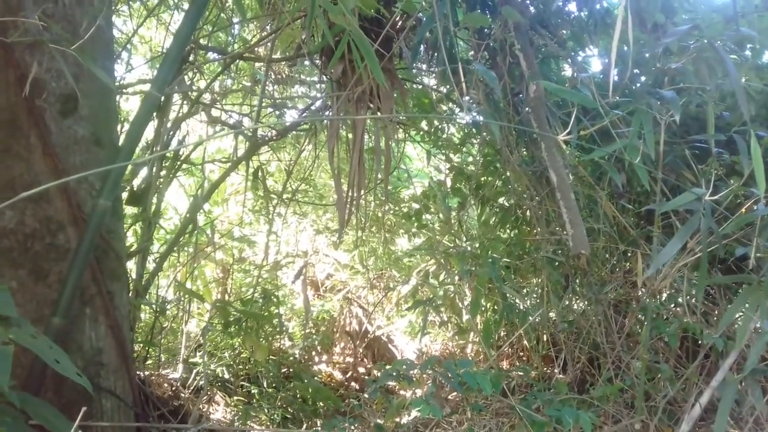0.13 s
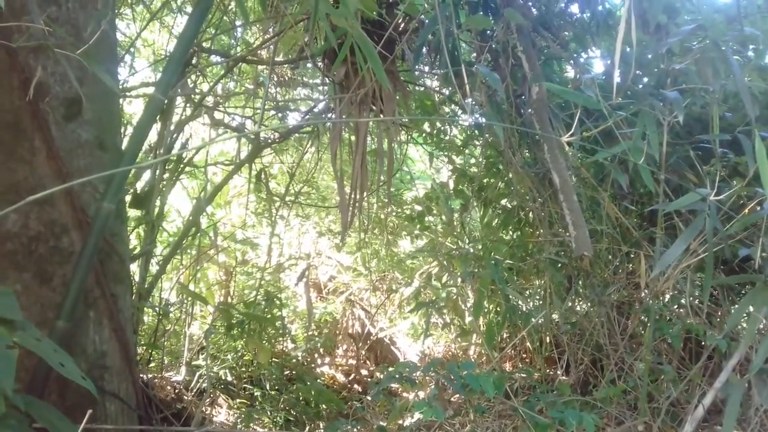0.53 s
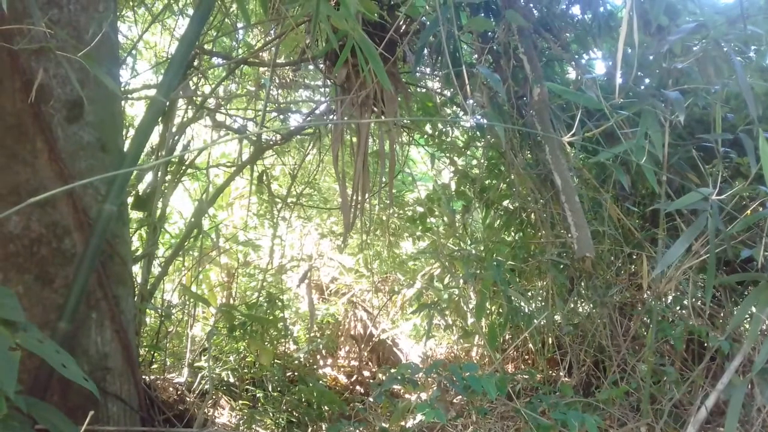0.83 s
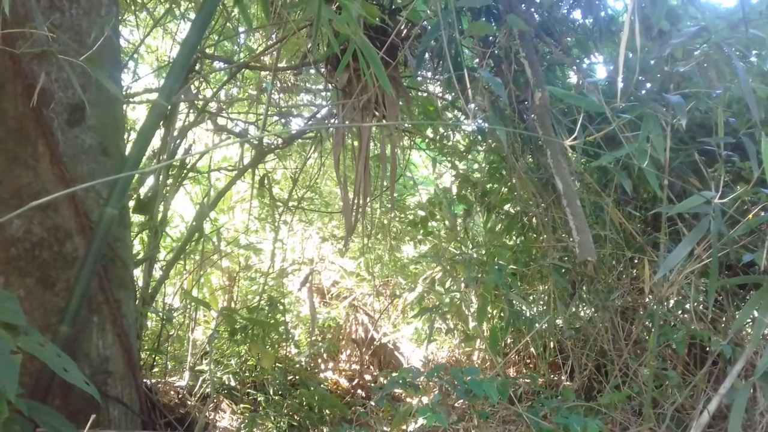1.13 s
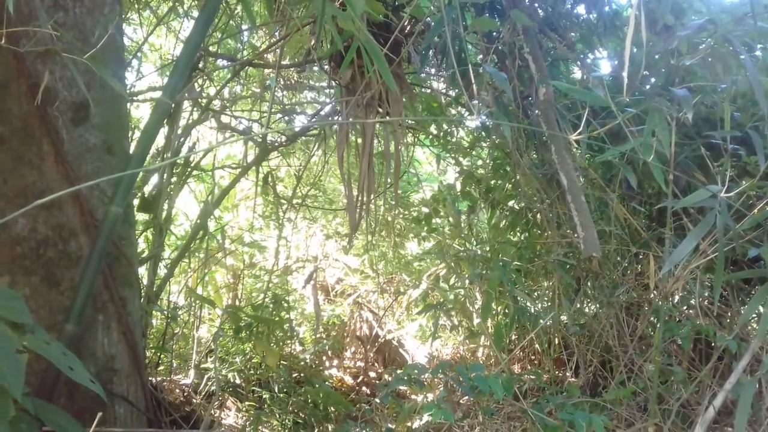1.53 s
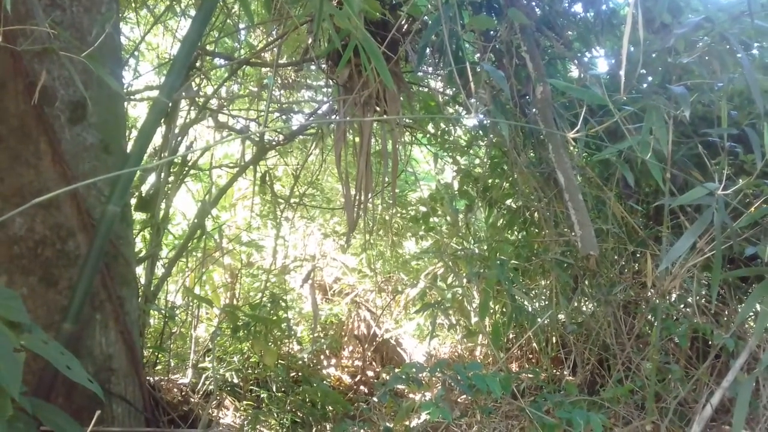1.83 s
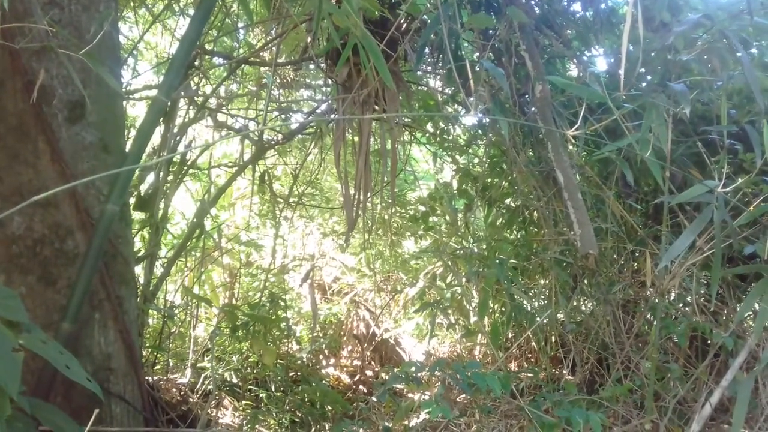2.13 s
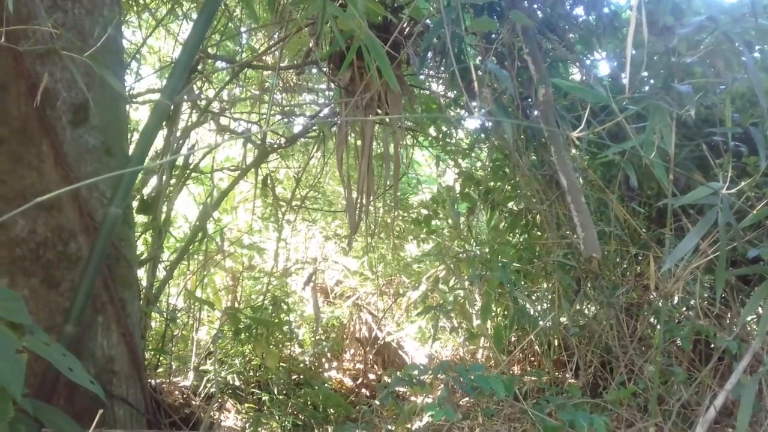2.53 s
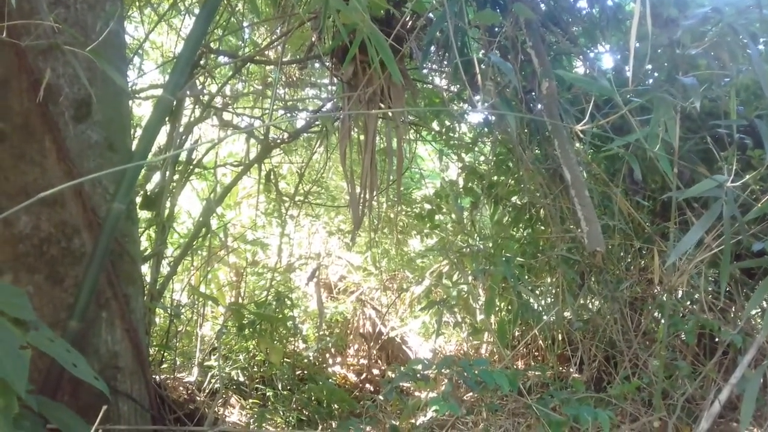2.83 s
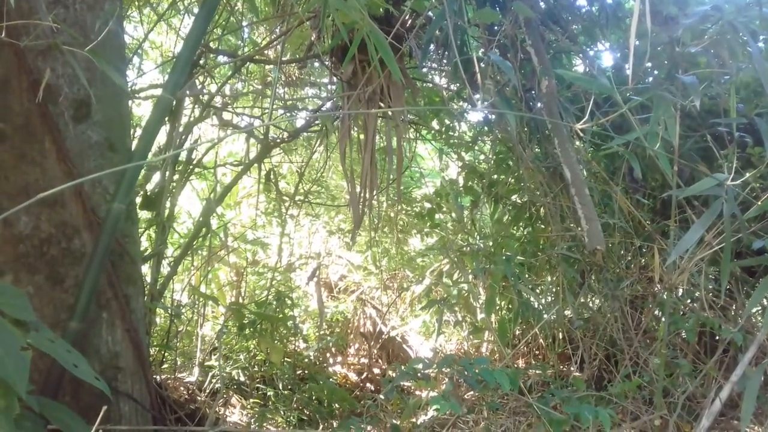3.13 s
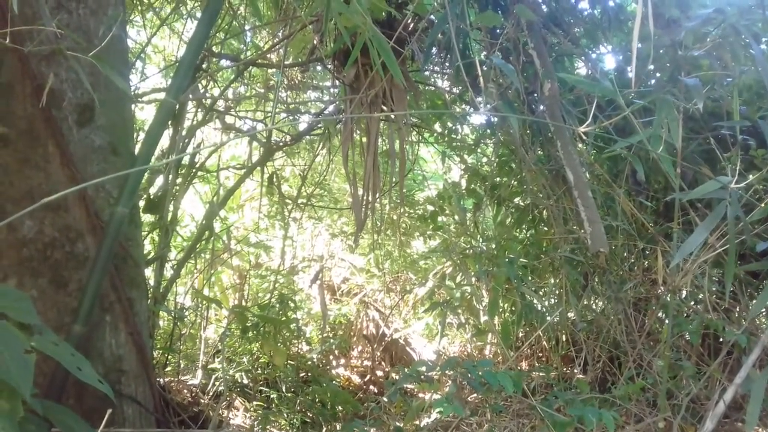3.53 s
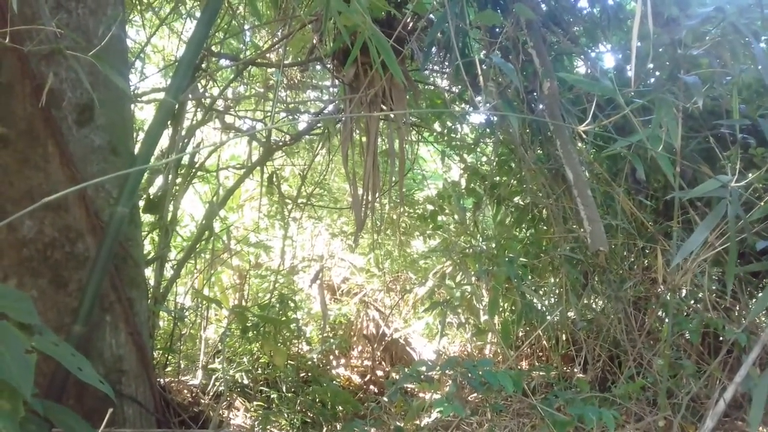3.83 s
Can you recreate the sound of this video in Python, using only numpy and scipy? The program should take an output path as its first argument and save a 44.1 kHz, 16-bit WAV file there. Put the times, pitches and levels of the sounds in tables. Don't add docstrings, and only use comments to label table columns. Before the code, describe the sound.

Harsh, short rasping squawks begin at once, answered by duller nasal honks; a tiny falling songbird whistle comes midway, then a dense burst of calls. Trunks and leaves scatter the sound over quiet hiss and hum.

```python
import sys
import numpy as np
from scipy import signal
from scipy.fft import rfft, irfft
from scipy.io import wavfile
from scipy.ndimage import uniform_filter1d

SR = 44100
rng = np.random.default_rng(int(sys.argv[2]) if len(sys.argv) > 2 else 0)


def master(y):
    cut = np.clip(np.atleast_2d(y).T, -1, 1)
    pcm = np.round(cut * 32767)
    wavfile.write(sys.argv[1], SR, pcm.astype(np.int16))


def invert_db(x):
    u = np.asarray(x, float) / 20
    return 10 ** u


N = 176400
PAD = 4096


def band(x, hz, width_hz):
    return signal.lfilter(*signal.iirpeak(hz, hz / width_hz, fs=SR), x)


def butter(x, order, hz, kind="low"):
    return signal.sosfilt(signal.butter(order, hz, kind, fs=SR, output="sos"), x)


def unit(x):
    return x / np.sqrt(np.mean(x ** 2) + 1e-18)


def walk(rate):
    hold = int(SR / rate)
    steps = np.repeat(rng.standard_normal(N // hold + 1), hold)
    smooth = uniform_filter1d(uniform_filter1d(steps, hold), hold)
    return unit(smooth[:N])


def add(track, start, sound):
    at = PAD + int(start * SR)
    track[at:at + len(sound)] += sound


# f/Hz, level/dB
HUM_LINES = [(125.5, -71.5), (252, -78)]


def hum():
    turn = np.cumsum(1 + .008 * walk(0.6) + 0.0095 * walk(60.1)) / SR
    return sum(invert_db(db + 0.5) * np.sin(2 * np.pi * hz * turn) for hz, db in HUM_LINES)


# f/Hz, level/dB per Hz
HUSH_COLOUR = [(20, -24), (200, -13.5), (420, -6.5), (700, 0.5), (2000, -6.5), (2500, -13), (9000, -17.5),
               (15600, -14.5)]


def hush():
    level_db, sway_db, flicker_db = -56.5, .6, 1.3
    hz = np.fft.rfftfreq(N, 1 / SR) + 1
    table = np.array(HUSH_COLOUR)
    colour = invert_db(np.interp(np.log(hz), np.log(table[:, 0]), table[:, 1]))
    spectrum = rfft(rng.standard_normal(N)) * colour
    sway = sway_db * walk(1.71)
    octave = np.log2(hz / 20)
    total = np.zeros(N)
    for k in range(11):
        share = np.clip(1 - abs(octave - k), 0, 1)
        total += irfft(spectrum * share, N) * invert_db(sway + flicker_db * walk(9.85))
    return invert_db(level_db) * unit(total)


def insect():
    tone = unit(band(rng.standard_normal(N), 4760, 36))
    return tone * invert_db(-72 + 1.3 * walk(4.52))


# t/s, f/Hz, level/dB
WHISTLE_PATH = [
    (1.70, 4200, -70),
    (1.706, 4300, -57),
    (1.724, 4250, -56),
    (1.735, 3400, -54),
    (1.755, 2700, -53),
    (1.775, 2650, -60),
    (1.785, 2600, -80),
]


def whistle():
    t = np.arange(N) / SR
    when, pitch_hz, level_db = np.array(WHISTLE_PATH).T
    phase = 2 * np.pi * np.cumsum(np.interp(t, when, pitch_hz)) / SR
    level = np.interp(t, when, level_db, -150, -150) + 2 * walk(150)
    return np.sin(phase) * invert_db(level)


def woods(x):
    t = np.arange(SR) / SR

    def fade(t60_s):
        return np.exp(-np.log(1000) * t / t60_s)

    def below(noise, hz):
        return signal.sosfiltfilt(signal.butter(2, hz, fs=SR, output="sos"), noise)

    near_noise, far_noise = rng.standard_normal((2, SR))
    low, mid = below(near_noise, 1300), below(near_noise, 3200)
    near = invert_db(-6) * low * fade(0.22)
    near += (mid - low) * fade(0.25)
    near += (near_noise - mid) * fade(0.27)
    near *= 1 - np.exp(-t / 0.0046)
    far = far_noise * fade(1) * (1 - np.exp(-t / 0.062))
    echo = (invert_db(-2) * unit(near) + invert_db(-21) * unit(far)) / np.sqrt(SR)
    return x + signal.fftconvolve(x, echo)[:len(x)]


def rasp(length, hz, bend, sag, attack, jitter, scatter_db, breath, throat, chance):
    release_s, bend_s = .022, .009
    body_hz, body_scatter = 2800, .6
    t = np.arange(int((length + .04) * SR)) / SR
    age = np.arange(99) / hz
    rate = hz * (1 + bend * np.exp(-age / bend_s)) * (1 - sag * np.clip(age / length, 0, 1.5) ** 4)
    when = np.cumsum((1 + np.clip(jitter * chance[:99], -.6, .6)) / rate)
    keep = when < length + release_s
    size_db = scatter_db * np.clip(chance[99:198][keep], -3, 1.7)

    opening = np.sin(np.pi / 2 * np.clip(t / attack, 0, 1))
    closing = np.sin(np.pi / 2 * np.clip((length + release_s / 2 - t) / release_s, 0, 1))
    effort = (opening * closing) ** 2

    offset = t[:, None] - when[keep]
    snap = np.sinc(offset * SR * 1.02)
    puff = np.exp(-np.maximum(offset, 0) * hz / 0.69) * (offset > 0)
    shape = snap + breath * puff * chance[200:200 + len(t), None]
    body, edge = shape @ invert_db(body_scatter * size_db), shape @ invert_db(size_db)

    sound = np.zeros(len(t))
    for k, ((f, width, db), u, v) in enumerate(zip(throat, chance[-20:], chance[-40:])):
        f, db = f * (1 + .02 * u), db + 1.2 * v
        source = (body if f < body_hz else edge) * effort ** (1 + f / 12000)
        ring = band(band(source, f, width * 1.59), f, width * 1.59)
        sound += (-1) ** k * invert_db(db) * ring
    return sound / np.sqrt(np.sum(sound ** 2) / (length * SR))


# t/s, length/s, level/dB, first pulse f/Hz, held pulse f/Hz
CLEAR_HONKS = [
    (.378, 0.041, -31, 1087, 757),
    (.628, 0.036, -32, 752, 733),
    (2.165, 0.032, -29.5, 775, 728),
    (2.289, 0.037, -25.5, 761, 759),
    (2.501, 0.033, -26.5, 740, 738.6),
    (2.584, 0.027, -43, 1213, 790),
    (2.74, 0.035, -33.5, 790, 796),
    (3.477, 0.035, -26.5, 740, 763.4),
]
# t/s, length/s, level/dB, first pulse f/Hz, held pulse f/Hz
HOARSE_HONKS = [
    (.985, 0.022, -51.5, 758, 727),
    (2.075, 0.067, -45, 740, 706),
    (3.395, 0.04, -35.5, 755, 744),
]
# f/Hz, width/Hz, level/dB
MATE_THROAT = [(740, 300, -8), (1500, 300, -1), (2230, 260, 6), (3000, 500, -11), (4200, 1200, -16),
               (6000, 2000, -17), (8800, 3000, -18)]


def honks(track):
    lead_s, attack_s, sag = .004, .016, .13
    for calls, rough in ((CLEAR_HONKS, .17), (HOARSE_HONKS, .8)):
        chances = rng.standard_normal((len(calls), 9000))
        for (start, length, db, first_hz, hz), chance in zip(calls, chances):
            call = rasp(length + lead_s, hz, first_hz / hz - 1, sag, attack_s,
                        rough / 10, 10 * rough, rough / 2, MATE_THROAT, chance)
            add(track, start - lead_s, invert_db(db) * call)
    return track


# t/s, length/s, level/dB, first f/Hz, last f/Hz
LEAD_SQUEALS = [(0.151, 0.037, -28.5, 1608, 1836), (0.361, 0.026, -35, 620, 1550),
                (0.547, 0.018, -31, 1550, 1726), (0.562, 0.022, -31.5, 1907, 1973),
                (.785, 0.017, -29.5, 1608, 1597), (1.987, 0.025, -38, 1010, 1720),
                (2.278, .013, -33, 1500, 1533), (2.432, 0.035, -28.5, 1500, 1843),
                (2.565, 0.016, -26, 1752, 1754), (2.714, 0.026, -28.5, 1622, 1747),
                (2.875, 0.013, -39, 1300, 1394), (2.889, 0.016, -31.5, 1770, 1860),
                (3.313, 0.015, -38.5, 1340, 1400), (3.328, 0.015, -31, 1840, 1828),
                (3.744, 0.028, -34, 1686, 1778), (3.986, .018, -30.5, 1300, 1645)]
SQUEAL_HARMONICS = [0, -8, -11, -12, -11]


def squeals(track):
    plunge_s, plunge_share = 0.00695, 0.47
    wobble = np.array([walk(500) for _ in range(6)])
    for start, length, db, first_hz, last_hz in LEAD_SQUEALS:
        t = np.arange(int((length + plunge_s) * SR)) / SR
        own = wobble[:, int(start * SR / 2):][:, :len(t)]
        plunge = np.clip((t - length) / plunge_s, 0, 1)
        climb = np.clip(1 - t / (.6 * length), 0, 1) ** 1.8
        hz = (last_hz + (first_hz - last_hz) * climb) * (1 - plunge_share * plunge)
        phase = 2 * np.pi * np.cumsum(hz * (1 + .011 * own[5])) / SR
        grow = np.clip(t / length, 0, 1)
        tone = np.zeros(len(t))
        for k, partial_db in enumerate(SQUEAL_HARMONICS):
            level = grow ** (1.03 + .5 * k) * invert_db(partial_db + 2.5 * own[k])
            tone += level * np.cos((k + 1) * phase)
        add(track, start, invert_db(db) * 2 * (1 - plunge) * tone)
    return track


# t/s, length/s, level/dB, pulse f/Hz, mouth resonance f/Hz
HARSH_SQUAWKS = [(-.065, .05, -28, 488, 2270), (0.066, .09, -26, 523, 2214),
                 (0.181, 0.073, -26, 509.6, 2095), (0.451, 0.069, -27.5, 513.6, 1980),
                 (0.565, 0.045, -26, 534, 1950), (0.763, 0.051, -31, 534.6, 2000),
                 (0.8, 0.028, -26, 512.2, 1926), (1.21, 0.04, -30, 522, 2120),
                 (1.533, 0.047, -31, 501, 2250), (1.874, 0.052, -31, 520.2, 2480),
                 (2.009, 0.039, -28.5, 502.4, 2290), (2.352, 0.055, -28, 527, 2250),
                 (2.465, 0.038, -26, 521.7, 2020), (2.584, 0.03, -23.5, 797.7, 2280),
                 (2.737, 0.039, -22.5, 764.4, 2000), (2.769, 0.056, -26.5, 505, 2180),
                 (2.871, .022, -31.5, 518.5, 2270), (2.903, .038, -25.5, 521.4, 2060),
                 (3.199, 0.051, -27, 517, 2170), (3.341, 0.039, -26.5, 504, 2160),
                 (3.651, 0.058, -28, 523.3, 2235), (3.768, 0.033, -26.5, 515.5, 2106),
                 (3.967, 0.032, -33, 525, 2160)]
# f/Hz, width/Hz, level/dB
RASPER_THROAT = [(530, 250, -12), (1050, 350, -9), (1550, 400, -4), (3200, 900, -8), (4900, 1200, -7),
                 (6400, 1500, -11), (8800, 2500, -10), (12000, 4000, -14)]


def squawks(track):
    lead_s, attack_s = .01, .03
    chances = rng.standard_normal((len(HARSH_SQUAWKS), 9000))
    for (start, length, db, hz, mouth_hz), chance in zip(HARSH_SQUAWKS, chances):
        throat = RASPER_THROAT[:3] + [(mouth_hz, 270, 6)] + RASPER_THROAT[3:]
        call = rasp(length + lead_s, hz, bend=.1, sag=.08, attack=attack_s, jitter=.075,
                    scatter_db=4.5, breath=.13, throat=throat, chance=chance)
        add(track, start - lead_s, invert_db(db) * call)
    return track


def scene():
    birds = sum(voice(np.zeros(N + 3 * PAD)) for voice in (honks, squeals, squawks))
    birds[PAD:PAD + N] += whistle()
    heard = woods(birds)[PAD:PAD + N] * invert_db(-3)
    heard = butter(heard, 3, 380, "high")
    return (hum() + hush() + insect() + heard)[None]


def top_cut(x):
    return signal.sosfilt(signal.butter(12, 15740, fs=SR, output="sos"), x)


def record(dry):
    port = dry + 1.2 * band(dry, 8800, 2200)
    port = butter(port, 2, 9700)
    port = signal.sosfilt(signal.ellip(8, .2, 60, 15850, fs=SR, output="sos"), port)
    mix = port - .0006
    return top_cut(mix)


dry = scene()
out = record(dry)
master(out)
```